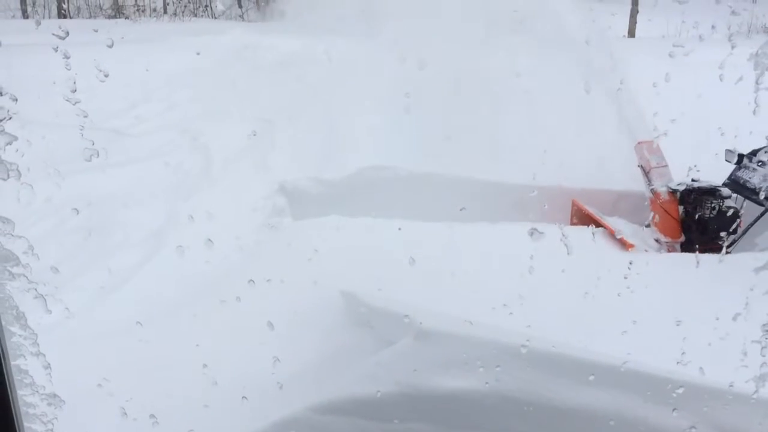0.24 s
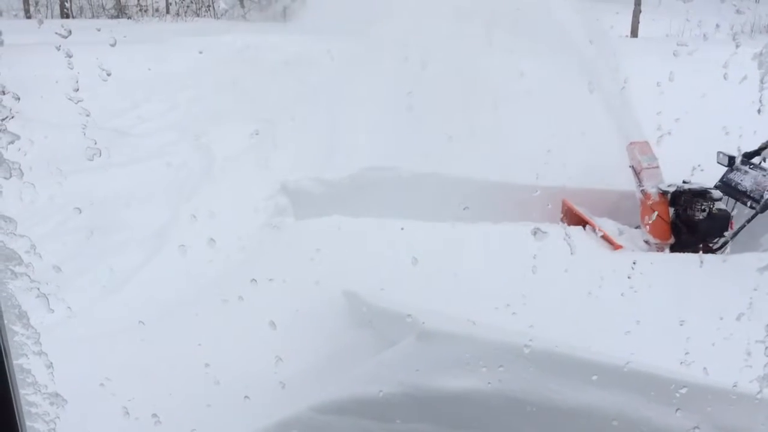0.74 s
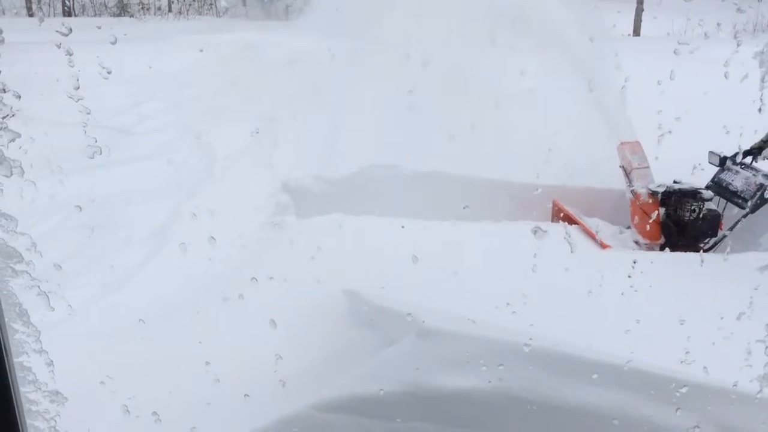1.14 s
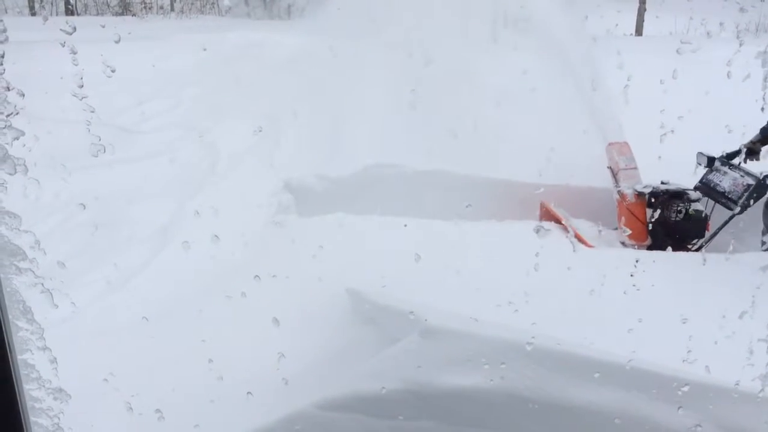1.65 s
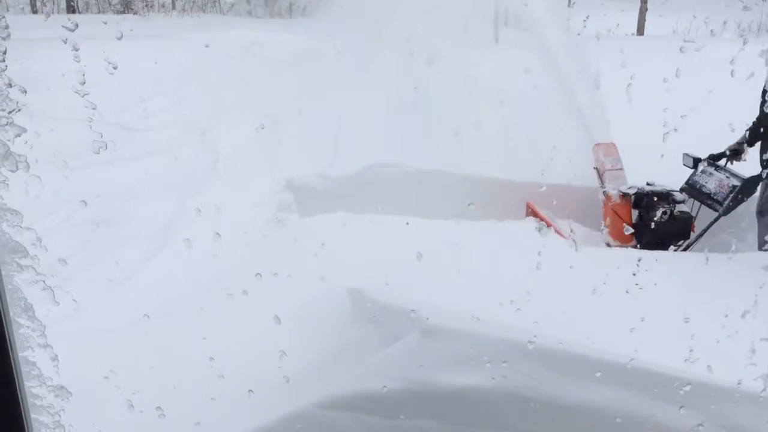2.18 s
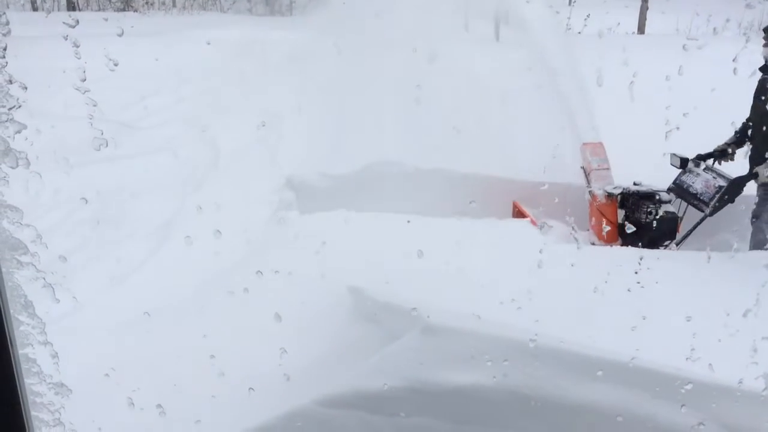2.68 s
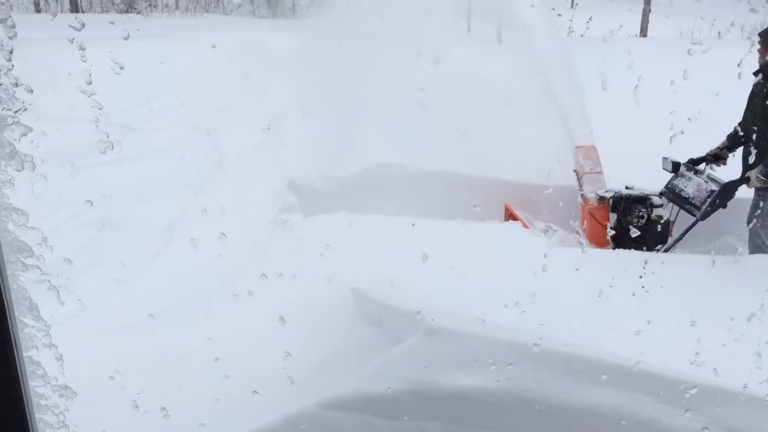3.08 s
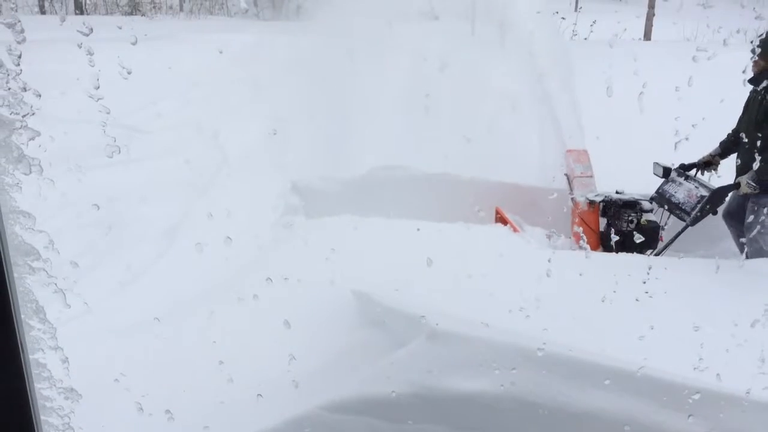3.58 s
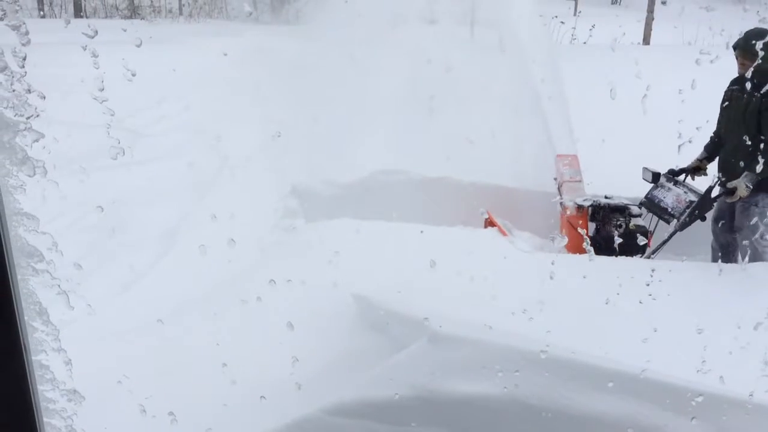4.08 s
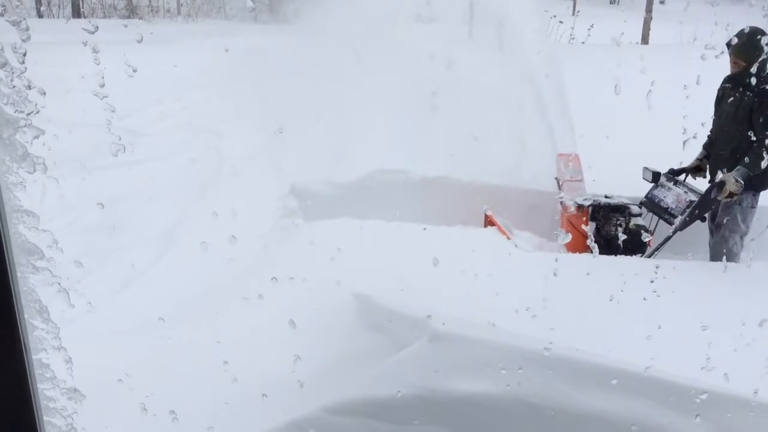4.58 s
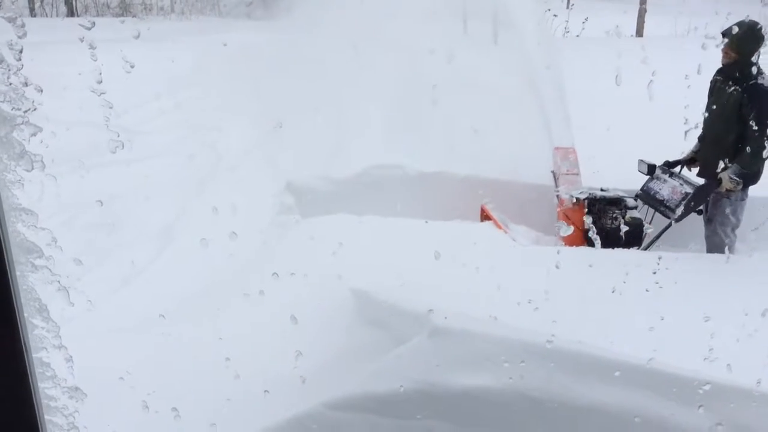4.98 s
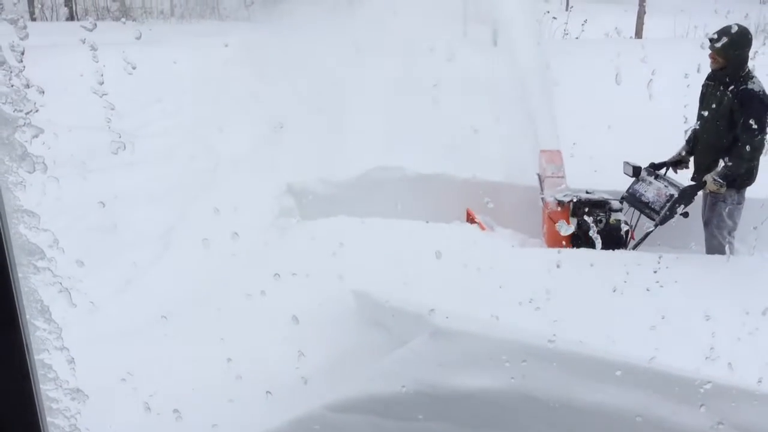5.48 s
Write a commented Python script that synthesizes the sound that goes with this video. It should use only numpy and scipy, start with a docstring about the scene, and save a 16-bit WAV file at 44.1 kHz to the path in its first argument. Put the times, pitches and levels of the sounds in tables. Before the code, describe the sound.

A one-cylinder snowblower runs steadily outside, heard from indoors through a closed window. Its rapid, muffled throb carries faint ticking and the churn of the auger, over a low appliance hum and a thin metallic whine. The engine sags slightly three times in deep snow, then picks up. Thrown snow patters faintly in the second half, and the hand-held microphone pops once at the end.

```python
"""A one-cylinder snowblower works through deep snow, heard through a closed window. From the start each
firing thumps the pane and ticks, the auger churns, an appliance hums, metal whines; a hand rustles.
Near 1.2 s the first of three drifts slows the engine, and at 1.5 s a far motor's drone grows louder.
From about 3 s thrown snow patters more clearly, and a thin whistle swells until 4.7 s.
Then the engine speeds up in thin snow, and the hand-held microphone rustles again and pops once."""
import sys
import numpy as np
from scipy import signal
from scipy.fft import rfft, irfft
from scipy.io import wavfile

SR = 44100
rng = np.random.default_rng(int(sys.argv[2]) if len(sys.argv) > 2 else 0)


def waveform_to_disk(signal):
    """Save audio, clipped to [-1, 1], as 16-bit WAV at the path in sys.argv[1]."""
    frames = np.transpose(np.atleast_2d(signal))
    scaled = np.clip(frames, -1, 1) * 32767
    samples = np.round(scaled).astype(np.int16)
    wavfile.write(sys.argv[1], SR, samples)


N = 253134

# rush of air in the room: pitch_hz, level_db_per_hz
ROOM_AIR = [(400, -108), (1200, -105), (2050, -107), (2600, -110.7), (3750, -111), (4200, -115.2),
            (5600, -118.6), (6200, -122.5), (7200, -124.5), (8200, -120), (9300, -119), (11000, -124),
            (12300, -124.5), (13000, -134)]
# mains hum and fan tones of the appliance: pitch_hz, level_db
HUM_TONES = [(120, -55.4), (340, -74), (360, -81), (388, -86), (436, -81.5), (510, -81), (557.6, -74.2),
             (566, -81.5), (669, -83), (726, -86), (826, -81), (920, -86.5), (946, -86.5), (1043, -86.5),
             (1115, -84.7), (1400, -88), (2007, -84.8), (2230, -94), (4404, -101)]
# notes at which air makes its casing ring: pitch_hz, width_hz, level_db
CASING_RINGS = [(432, 18, -81.5), (1407, 16, -85.6), (1532, 28, -85.6), (1947, 17, -88.3), (2110, 30, -94)]
# rings of the metallic whine, before it grows: pitch_hz, width_hz, level_db
WHINE_RINGS = [(3010, 40, -96.5), (3156, 40, -97), (3480, 30, -94), (3725, 32, -89.5), (3796, 35, -95.5)]
# rustles of the hand: peak_s, level_db_per_hz, fade_s, brightness_db_per_octave
HAND_RUSTLES = [(0.0, -111, 0.019, -3), (.080, -106, 0.032, -3), (.121, -109.5, .022, 0),
                (3.135, -116.5, .035, 15), (4.015, -118, .012, 15), (5.563, -108, 0.014, 1)]
# tone colour of a finger slipping on the microphone's housing: pitch_hz, gain_db
FINGER_COLOUR = [(2000, -16), (4000, -4), (5500, -4.5), (7000, -6), (8500, 0), (10300, 1), (11600, -9),
                 (15000, -16)]
# hollow rings of the microphone's opening: pitch_hz, width_hz, level_db
OPENING_RINGS = [(820, 330, -36), (1830, 380, -40.5)]
# tone colour of icy grains of thrown snow, when near: pitch_hz, level_db_per_hz
SPRAY_COLOUR = [(1000, -135), (2800, -114.5), (4000, -117), (7000, -131), (9000, -123), (12000, -127),
                (14500, -134)]
# tone colour of auger, impeller and flying snow behind the glass: pitch_hz, relative_level_db
CHURN_COLOUR = [(15, -96), (30, -96), (57, -80), (68, -83), (85, -77.5), (102, -74), (128, -78.5),
                (144, -81), (172, -74), (195, -78), (208, -85), (222, -81.5), (238, -85), (268, -83),
                (298, -85.5), (317, -80.5), (350, -96.5), (420, -89.3), (480, -93.5), (620, -88.3),
                (668, -92), (690, -98), (740, -92.3), (870, -97.7), (900, -96.5), (1050, -100.5),
                (1200, -97.5), (1290, -107), (1500, -107), (8000, -150)]
# tone colour of the tick at each firing: pitch_hz, relative_level_db
TICK_COLOUR = [(3000, -120), (5200, -116), (7200, -122), (8300, -110), (9500, -108), (11200, -114),
               (12300, -112), (13200, -127), (14000, -124), (15000, -129)]
# short pings within the tick: pitch_hz, relative_level_db, change_db_per_s
TICK_PINGS = [(8220, -106, -1), (9100, -103.5, 2.1), (9570, -108, -2)]
# firings that tick harder than most: near_s, extra_db
HARD_FIRINGS = [(.624, 4), (1.064, 3.5), (1.308, 2), (1.631, 6), (2.024, 3.5), (2.453, 3), (2.493, 5),
                (2.728, 3), (2.767, 2.5), (2.846, 3.5), (3.351, 1), (4.063, 3), (4.262, 4), (4.302, 4),
                (4.501, 3), (4.617, 0), (4.733, 3), (4.771, 3), (4.924, 1), (4.962, 3), (4.999, 3)]
# lighter taps of the valves: after_firing_s, share_of_tick
VALVE_CLICKS = [(0.014, 0.3), (.0245, 0.27)]
# drifts the auger bites into: deepest_s, half_length_s, slowdown_hz (negative for thin snow)
SNOW_DRIFTS = [(1.196, .556, 1.387), (2.56, .429, .427), (4.076, .564, .951), (5.154, .463, -.822)]
# notes at which pane and room ring: pitch_hz, width_hz, relative_level_db, full_throttle_extra_db
PANE_RINGS = [(53.6, 2.2, 5.8, -6), (80.5, 2.6, .3, 1.5), (102.7, 8.8, 2.4, 1), (125.9, 14, -4.2, 1),
              (152, 6.4, 5.8, -.5), (173.2, 3.6, -3.4, 0), (221.9, 8.4, -5.3, 5.3), (252, 7, -11, 1),
              (266.5, 3.4, -4.5, -2), (272, 5, -22, 16.5), (293, 4, -16, -3), (305, 5, -14.5, 0),
              (319, 4, -19, 0), (600, 120, -12, 0)]


def undb(db):
    """Turn decibels into a number to multiply by."""
    return 10 ** (np.asarray(db) / 20)


def level(x, db):
    """Scale a sound to an average (rms) level."""
    return x * undb(db) / np.sqrt(np.mean(x ** 2))


def clock():
    """The time of every sample, in seconds."""
    return np.arange(N) / SR


def hump(peak_s, half_s):
    """A smooth rise and fall that reaches 1 at peak_s."""
    return np.exp(-((clock() - peak_s) / half_s) ** 2)


def hiss():
    """Even (white) noise at 0 dB per Hz."""
    return rng.standard_normal(N) * np.sqrt(SR / 2)


def coloured(points, source=None):
    """Shape hiss, or another source, along a curve of (pitch_hz, gain_db) points."""
    hz, db = np.transpose(points)
    bins_hz = np.arange(N // 2 + 1) * SR / N
    source = hiss() if source is None else source
    curve_db = np.interp(np.log(bins_hz + 1e-9), np.log(hz), db)
    return irfft(rfft(source) * undb(curve_db), N)


def ring(x, hz, width_hz):
    """Let a sound ring at one pitch; a narrower ring lasts longer."""
    return signal.lfilter(*signal.iirpeak(hz, hz / width_hz, fs=SR), x + 1e-18)


def soften(x, hz, order=2):
    """Turn down everything above a pitch."""
    return signal.sosfilt(signal.butter(order, hz, fs=SR, output="sos"), x + 1e-18)


def wander(rate_hz):
    """A smooth random wobble, about 1 in size."""
    bins_hz = np.arange(N // 2 + 1) * SR / N
    return level(irfft(rfft(rng.standard_normal(N)) * np.exp(-(bins_hz / rate_hz) ** 2), N), 0)


def appliance(waver=0.000704, flutter_db=2.0):
    """Mains hum and fan tones waver slightly over air rushing through a ringing casing."""
    out = coloured(ROOM_AIR)
    for hz, db in HUM_TONES:
        angle = 2 * np.pi * (rng.random() + np.cumsum(hz * (1 + waver * wander(6.34))) / SR)
        wobble_db = flutter_db * min(hz / 800, 1) * wander(9.6)  # high fan tones are the least steady
        out += level(np.sin(angle) * undb(wobble_db), db)
    for hz, width, db in CASING_RINGS:
        out += level(ring(ring(hiss(), hz, 2 * width), hz, 2 * width), db)
    return out


def whine(growth_db=2., waver=.003, flutter_db=1.8):
    """Rough metallic rings, close in pitch, waver, flutter and slowly grow."""
    out = 0
    for hz, width, db in WHINE_RINGS:
        angle = 2 * np.pi * np.cumsum(hz * (1 + waver * wander(5.04))) / SR
        rough = wander(width) * np.sin(angle) + wander(width) * np.cos(angle)
        out += level(rough * undb(flutter_db * wander(14)), db)
    return out * undb(growth_db * clock() * SR / N)


def whistle(pitches_hz=(10379, 10417), wander_hz=4, floor=.3):
    """A thin, high whistle of two close tones swells and eases off."""
    tones = sum(np.sin(2 * np.pi * np.cumsum(hz + wander_hz * wander(11)) / SR) for hz in pitches_hz)
    return level(tones, -94) * (floor + hump(peak_s=4.7, half_s=1.2))


def far_motor(shaft_hz=41.2, light_db=-72, working_db=-60.5, work_s=1.5, rise_s=.37, strain_db=5.5):
    """A far motor takes up work and later strains; only its two lowest tones get through the wall."""
    work = np.clip((clock() - work_s) / rise_s, 0, 1)
    db = light_db + (working_db - light_db) * work + strain_db * hump(peak_s=4.05, half_s=.36)
    angle = 2 * np.pi * np.cumsum(shaft_hz + .24 * wander(1.93)) / SR
    drone = np.sin(2 * angle) + undb(-6) * np.sin(angle)
    return np.sqrt(2) * undb(db + wander(2.4)) * drone


def hand_rustles(rise_s=.005, pivot_hz=9000):
    """Fingers slip on the microphone's housing: brief soft hisses, the lightest ones the brightest."""
    out = np.zeros(N)
    for peak_s, db, fade_s, tilt_db in HAND_RUSTLES:
        age = clock() - peak_s
        swell = np.clip(age / rise_s, 0, 1) * np.exp(-abs(age) / fade_s)
        colour = [(hz, gain_db + tilt_db * np.log2(hz / pivot_hz)) for hz, gain_db in FINGER_COLOUR]
        out += swell * undb(db) * coloured(colour)
    return out


def microphone_pop(pop_s=5.6498, build_s=.0063, settle_s=.0025):
    """Pressure builds at the microphone's opening, lets go with a hollow snap and settles."""
    age = clock() - pop_s
    push = undb(-29.5) * np.sqrt(np.clip(1 + age / build_s, 0, 1))
    rebound = -undb(-25.5) * np.exp(-abs(age) / settle_s)
    thud = soften(np.where(age < 0, push, rebound), hz=1000, order=3)
    release = np.diff(1. * (age >= 0), prepend=0)
    snap = soften(undb(-26) * release, hz=10500, order=3)
    hollow = sum(undb(db) * np.sin(2 * np.pi * hz * age) * np.exp(-np.pi * width * abs(age))
                 for hz, width, db in OPENING_RINGS)
    return thud + snap - hollow * (age >= 0)


def snow_spray(grains_per_s=1200, scatter_db=4, approach_s=2.85, rise_s=2.1, far_gain=.37):
    """Icy grains of thrown snow patter faintly and grow louder as the chute draws near."""
    grains = (rng.random(N) < grains_per_s / SR) * rng.choice([-1, 1], N)
    sizes = undb(scatter_db * np.clip(rng.standard_normal(N), -2, 2))
    patter = level(grains * sizes, 0) * np.sqrt(SR / 2)  # as strong as hiss()
    nearness = far_gain + (1 - far_gain) * np.clip((clock() - approach_s) / rise_s, 0, 1)
    return coloured(SPRAY_COLOUR, patter) * nearness


def auger(age, surge=.14, surge_s=.0051, gain_db=-2.5):
    """The auger, a turning screw, churns snow unevenly; the noise surges with each firing."""
    return coloured(CHURN_COLOUR) * (1 + surge * np.exp(-age / surge_s)) * undb(gain_db + wander(9))


def engine_speed(usual_hz=25.901):
    """Firings per second: drifts slow the engine, and its speed control (the governor) brings it back."""
    return usual_hz - sum(slowdown_hz * hump(s, half_s) for s, half_s, slowdown_hz in SNOW_DRIFTS)


def firings(wait_cycles=.065, scatter_db=.7, rebound=.4):
    """Fuel burns once a cycle. Gives each sample's cycle and age in seconds, and each burn's strength."""
    rate_hz = engine_speed()
    cycles = np.cumsum(rate_hz) / SR + 1 - wait_cycles
    chance = rng.standard_normal(N // 100)
    burn = chance - rebound * np.roll(chance, 1)  # a weak burn leaves fuel for the next one
    strength = undb(2 * scatter_db * np.tanh(burn / 2))  # a full charge is the limit
    return cycles.astype(int), cycles % 1 / rate_hz, strength


def engine_ticks(cycle, age, scatter_db=1.2, rise_s=.0007, fade_s=.0042, ping_gain_db=-1):
    """Each firing gives a sharp tick with three pings in a shifting mix; the valves tap after it."""
    def tick(since_s):
        return (1 - np.exp(-since_s / rise_s)) * np.exp(-since_s / fade_s)

    size, *ping_sizes = undb(scatter_db * rng.standard_normal((N // 100, 4))).T
    firing_s = clock() - age
    for near_s, extra_db in HARD_FIRINGS:
        size[cycle[np.argmin(abs(firing_s - near_s))]] = undb(extra_db)
    sizzle = coloured(TICK_COLOUR)
    from_middle_s = clock() - N / SR / 2
    for (hz, db, db_per_s), ping_size in zip(TICK_PINGS, ping_sizes):
        ping = ring(ring(hiss(), hz, width_hz=370), hz, width_hz=270)
        sizzle += ping * undb(ping_gain_db + db + db_per_s * from_middle_s) * ping_size[cycle]
    nearness = undb(np.linspace(-1, -.5, N))  # the machine creeps toward the window
    valves = sum(share * tick(np.maximum(age - delay_s, 0)) for delay_s, share in VALVE_CLICKS)
    return sizzle * nearness * (size[cycle] * tick(age) + valves)


def exhaust(cycle, strength, soft_hz=390, full_throttle_drop_hz=.59, flex_hz=240, level_db=-52.5):
    """One rounded puff of pressure per firing pushes the pane and makes the room ring."""
    pulses = np.diff(cycle, prepend=cycle[0]) * strength[cycle]
    rate_hz = engine_speed()
    lead_in = np.tile(pulses[:int(SR / rate_hz[0])], 10)  # the engine is already running
    puffs = soften(np.r_[lead_in, pulses], soft_hz, order=4)
    # as the engine slows, the governor opens the throttle: the boom thins and higher rings growl
    throttle = np.clip((np.median(rate_hz) - rate_hz) / full_throttle_drop_hz, 0, 1)
    thumps = 0
    for hz, width, db, extra_db in PANE_RINGS:
        direction = np.sign(flex_hz - hz)  # higher up the pane bends against the push, softening it
        thumps += direction * undb(db + extra_db * throttle) * ring(puffs, hz, width)[-N:]
    return -level(thumps, level_db)


def scene():
    """Add the snowblower, the background and the hand on the microphone into one channel."""
    cycle, age, strength = firings()
    snowblower = exhaust(cycle, strength) + auger(age) + snow_spray() + engine_ticks(cycle, age)
    background = far_motor() + appliance() + whine() + whistle()
    handling = hand_rustles() + microphone_pop()
    return (snowblower + background + handling)[None]


def record(dry):
    """Cut off the highest treble, above 15150 Hz."""
    return signal.sosfilt(signal.ellip(10, .2, 70, 15150, fs=SR, output="sos"), dry)


dry = scene()
out = record(dry)
waveform_to_disk(out)
```